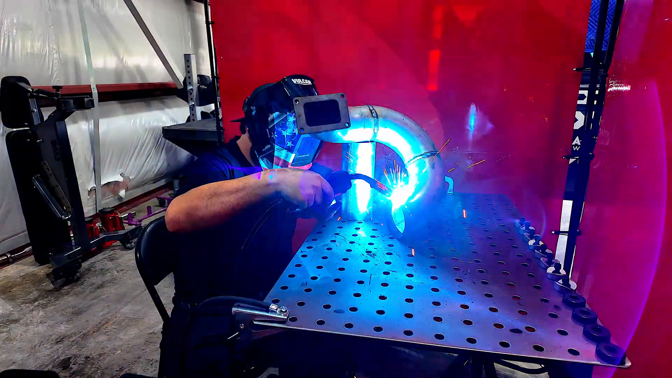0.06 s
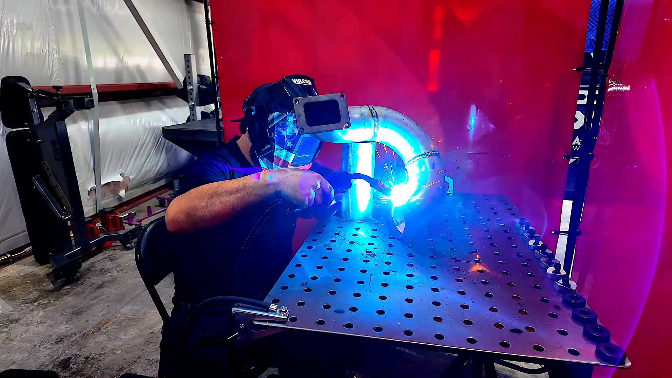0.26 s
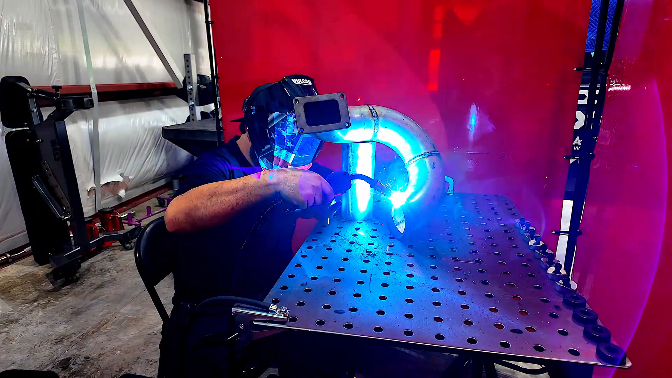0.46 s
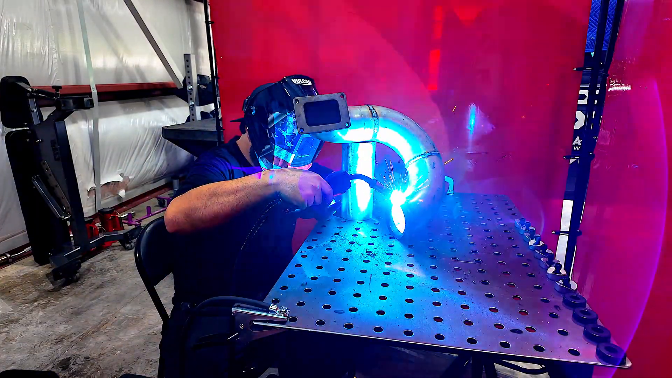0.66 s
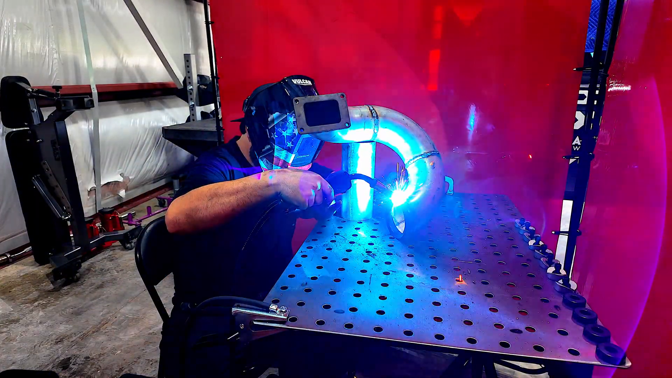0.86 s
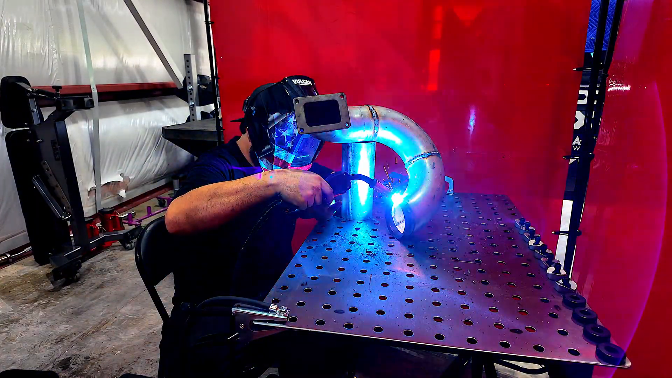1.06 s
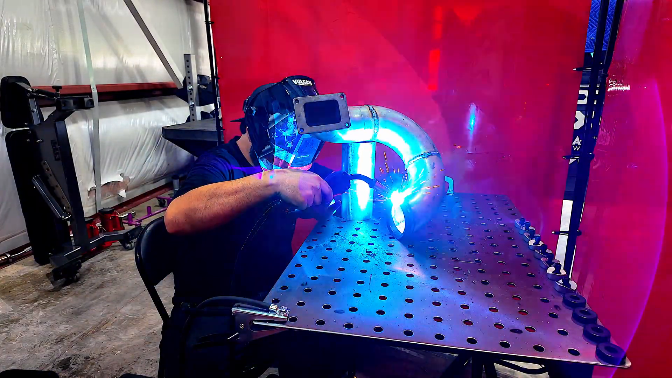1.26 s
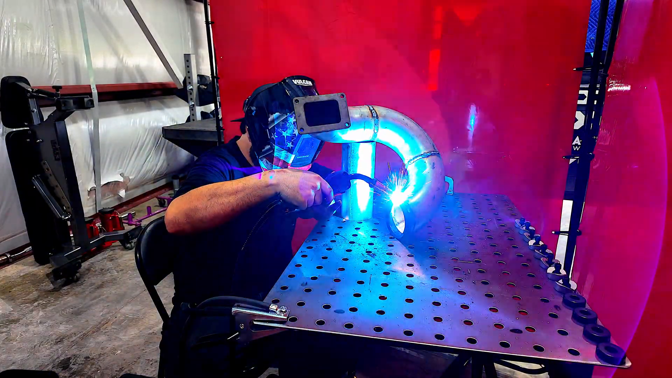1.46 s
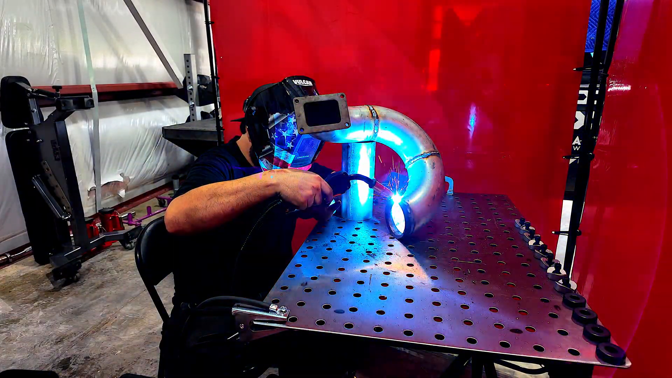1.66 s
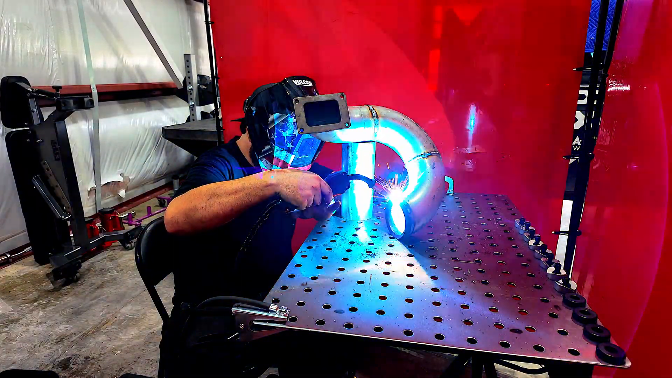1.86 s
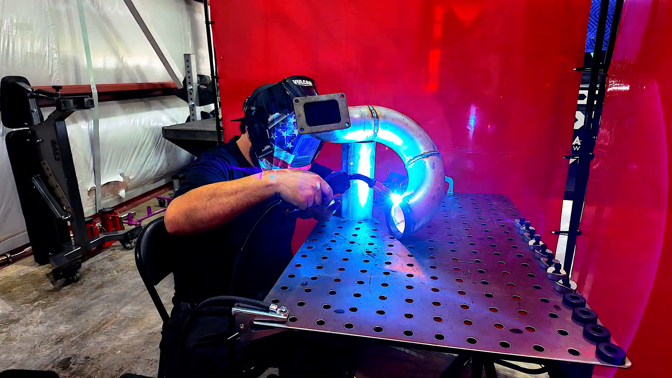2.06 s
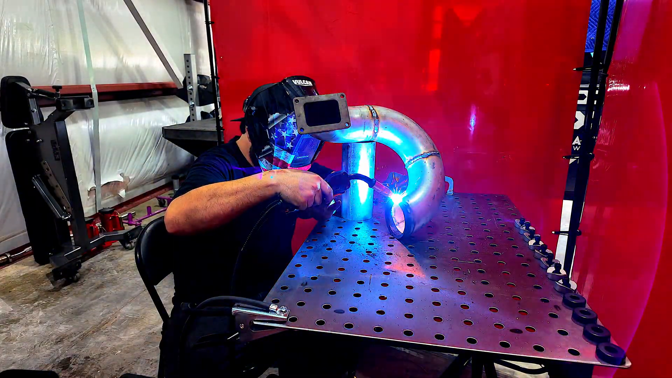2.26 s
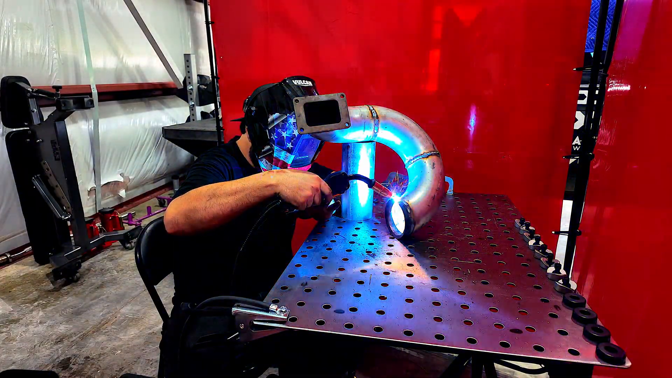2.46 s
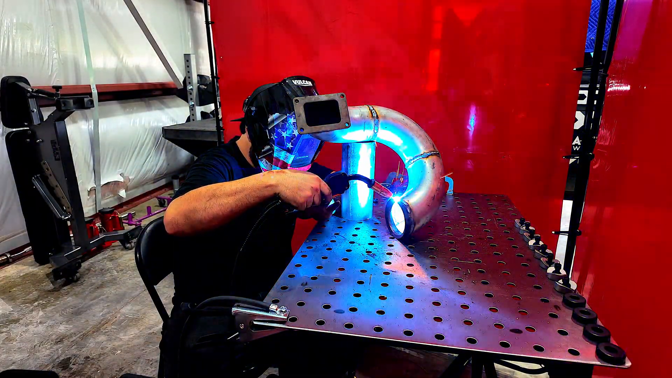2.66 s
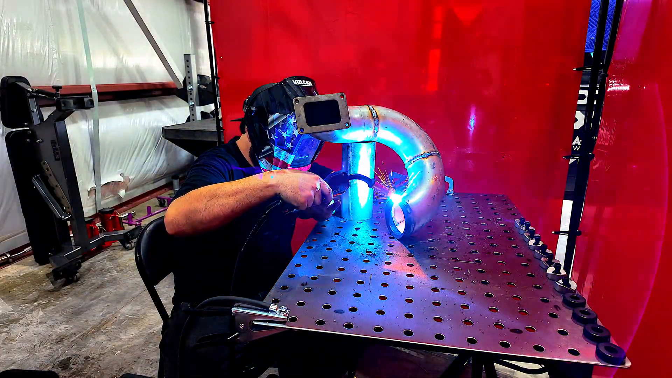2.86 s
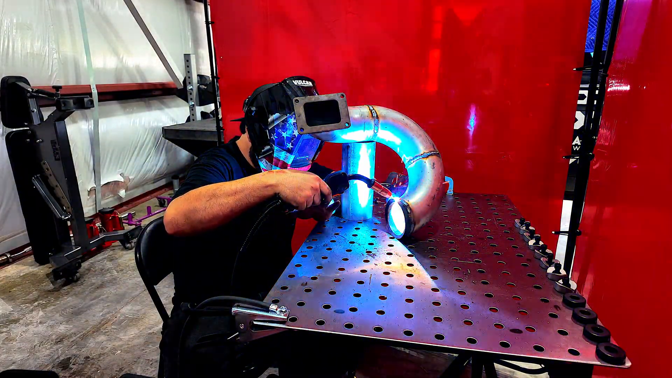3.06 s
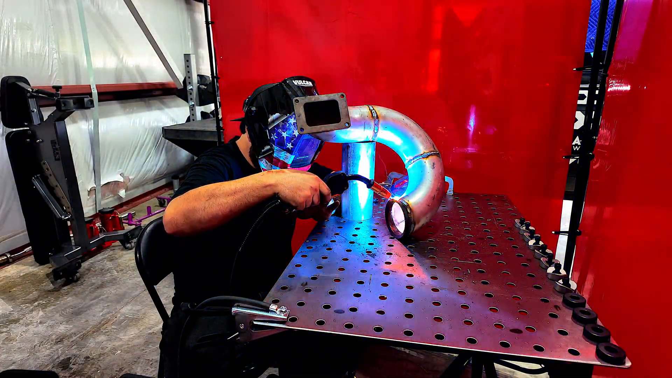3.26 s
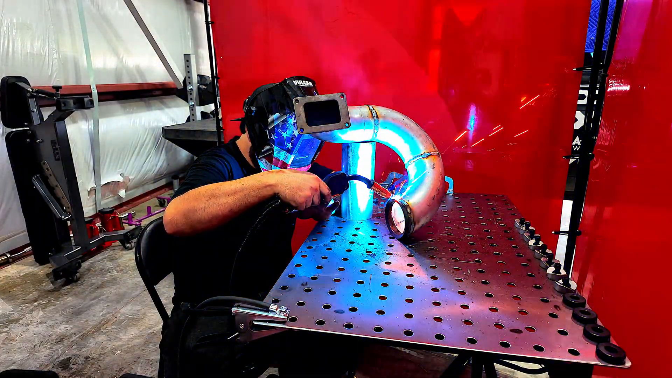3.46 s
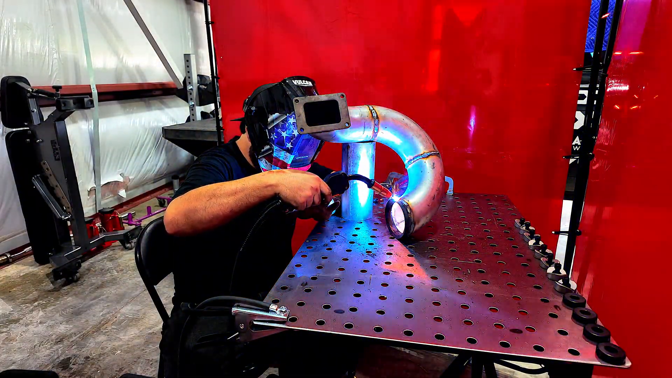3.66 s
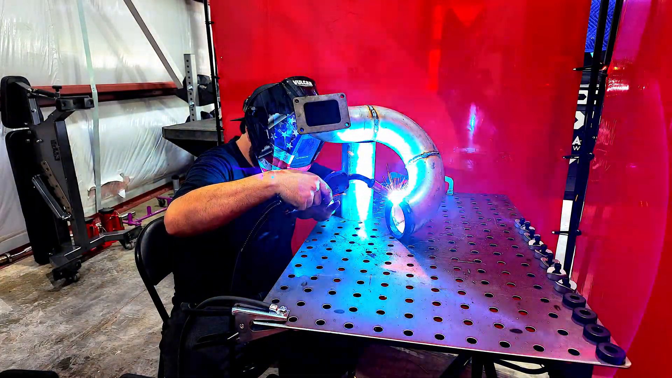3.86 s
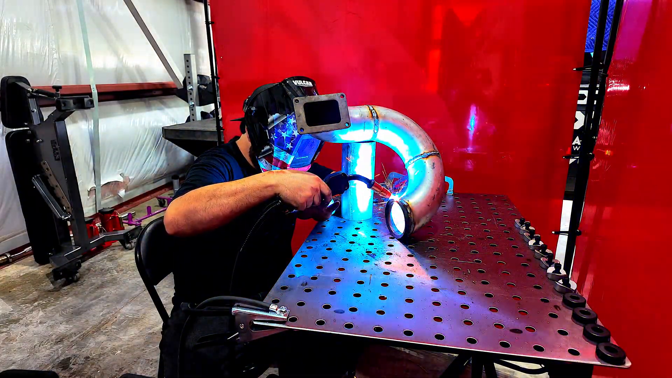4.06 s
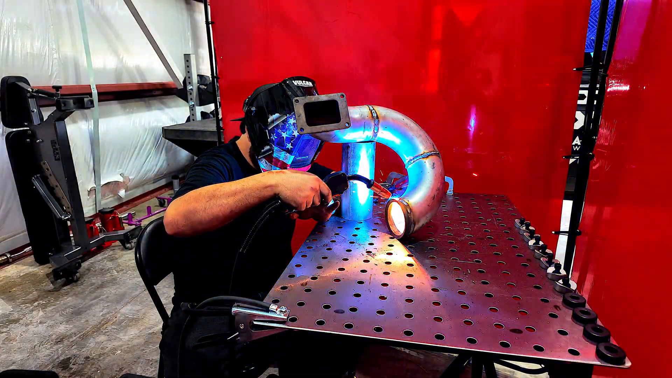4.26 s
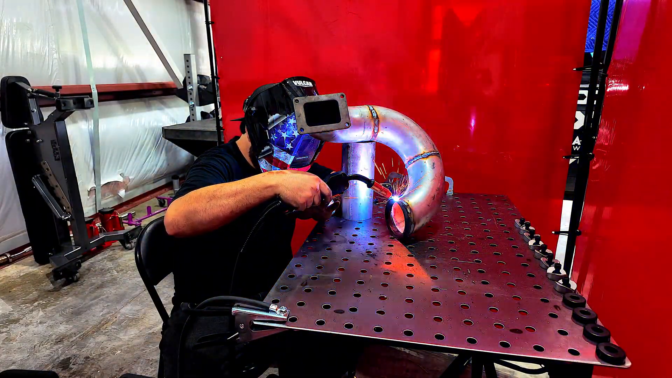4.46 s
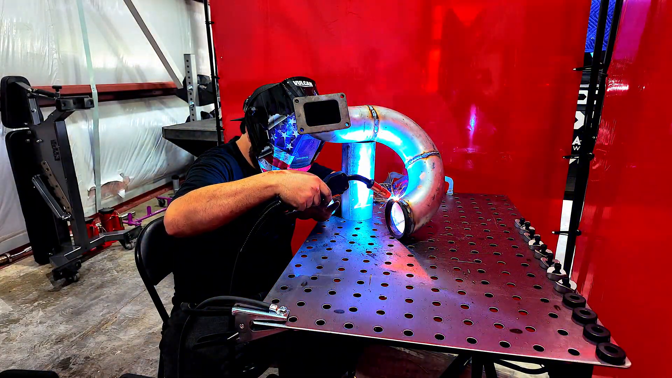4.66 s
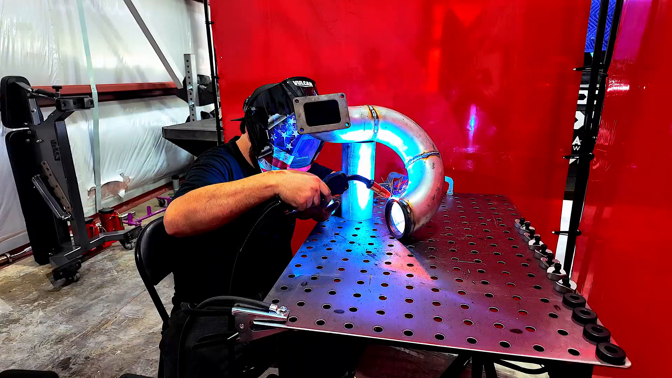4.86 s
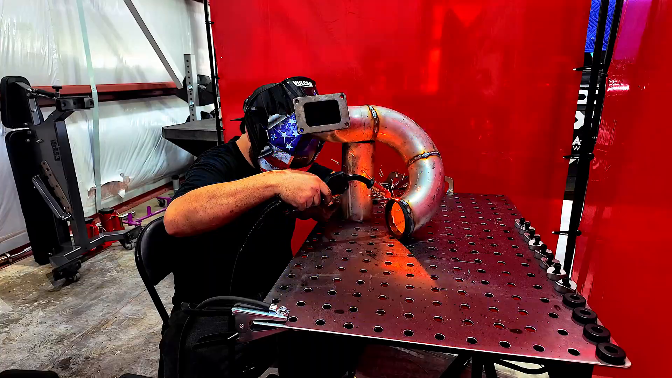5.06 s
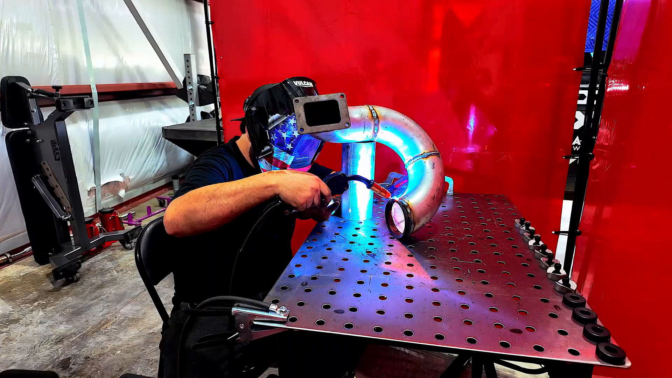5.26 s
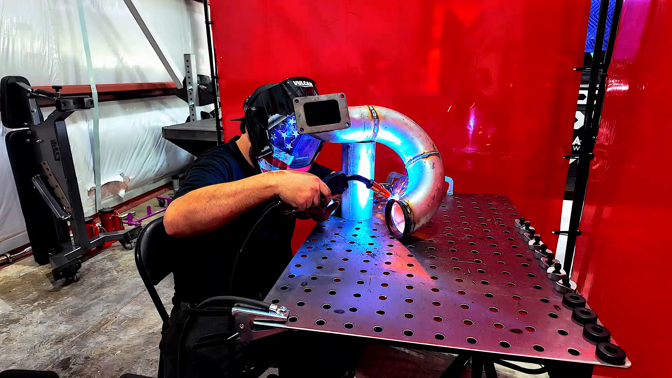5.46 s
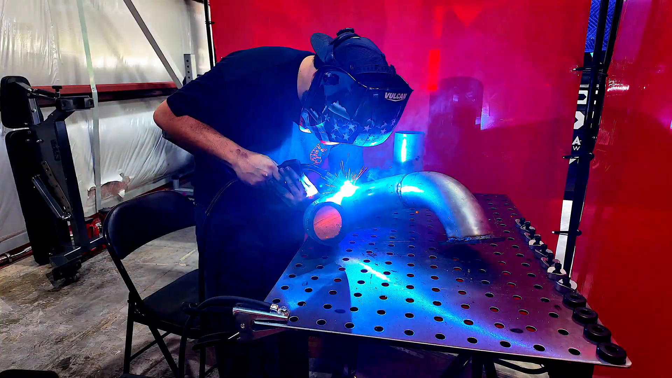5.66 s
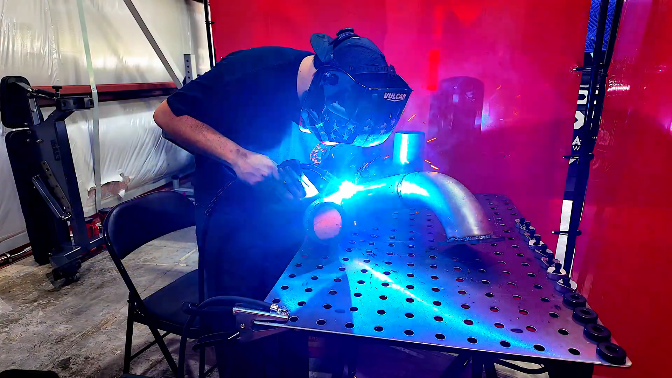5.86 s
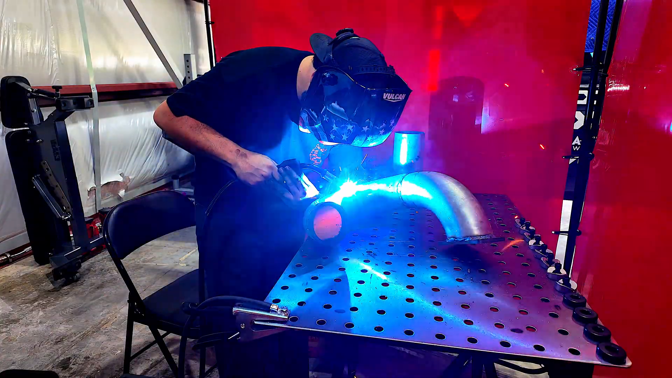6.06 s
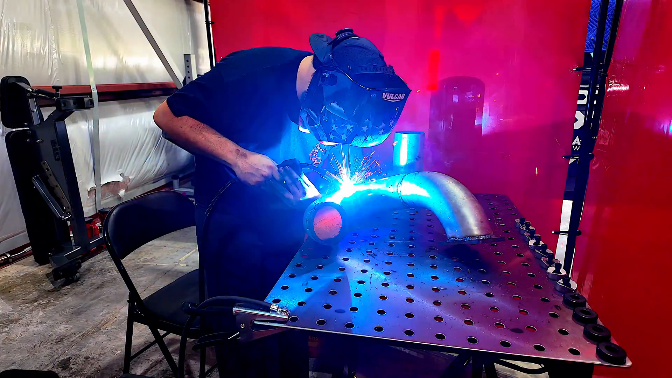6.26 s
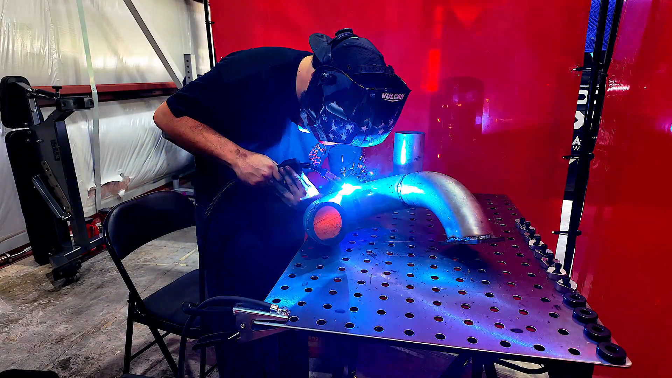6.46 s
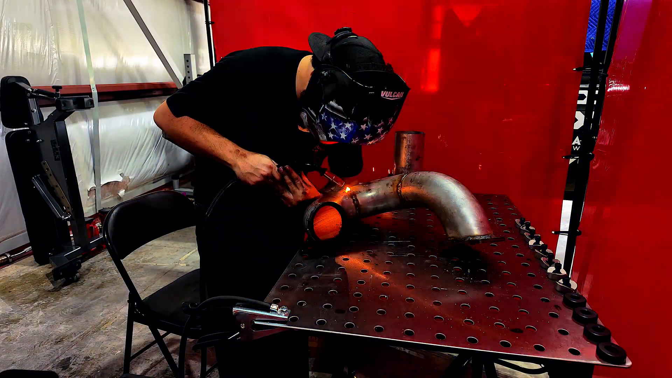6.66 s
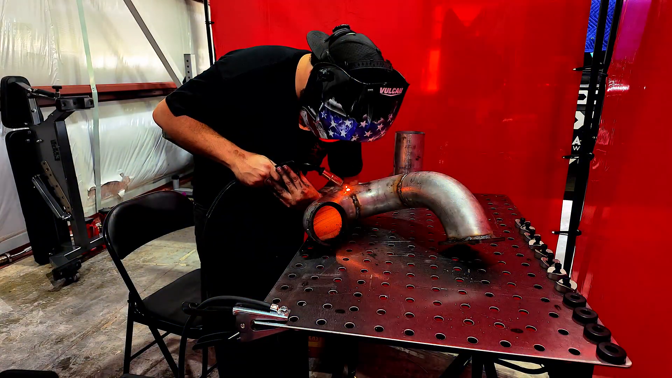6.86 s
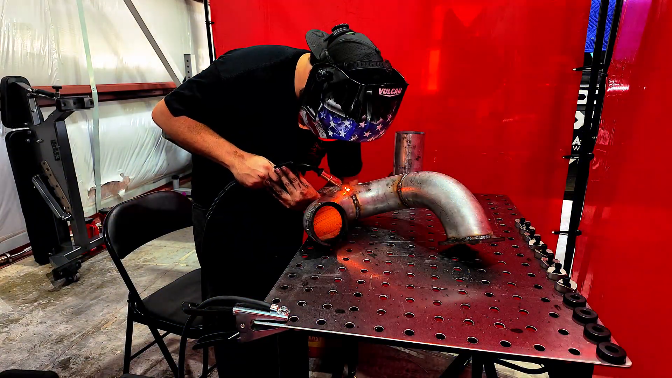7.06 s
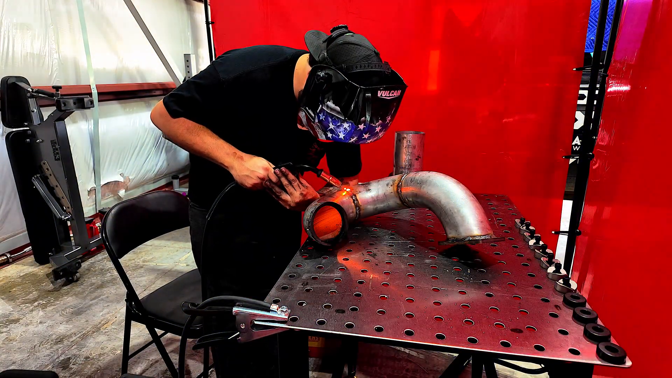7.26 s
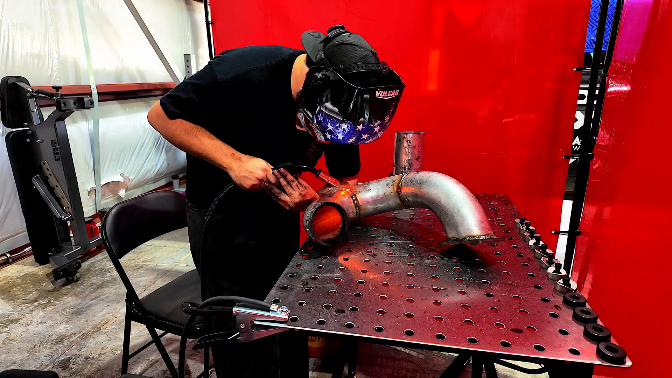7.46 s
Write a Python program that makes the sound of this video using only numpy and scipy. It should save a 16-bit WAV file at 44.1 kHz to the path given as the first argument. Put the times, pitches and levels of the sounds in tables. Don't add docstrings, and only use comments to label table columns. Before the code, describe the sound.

Sharp, rapid snapping and bright sizzling from an arc welding steel pipe in a workshop, ending abruptly before a faint gas hiss, metallic knock and dull drag.

```python
import sys
import numpy as np
from scipy import signal
from scipy.fft import rfft, irfft
from scipy.io import wavfile
from scipy.ndimage import uniform_filter1d

SR = 44100
rng = np.random.default_rng(int(sys.argv[2]) if len(sys.argv) > 2 else 0)


def rack_gain(trim_db):
    fader = np.asarray(trim_db, float)
    return 10 ** (fader / 20)


def wav_record(signal):
    frames = np.transpose(np.atleast_2d(signal))
    bounded = np.clip(frames, -1, 1)
    quanta = np.round(bounded * 32767).astype(np.int16)
    wavfile.write(sys.argv[1], SR, quanta)


N = 330750
TIME = np.arange(N) / SR
MOVE_S, ARC_OFF_S = 5.545, 6.76

# start_s, thump_db
BIG_DROPS_SEATED = [(0.0737, -17), (0.1139, -17), (0.1329, -18), (0.1695, -16), (0.1897, -16), (0.2134, -19),
                    (0.2361, -21), (0.2624, -18), (0.2868, -19), (0.3111, -17), (0.3363, -21), (0.3558, -19),
                    (0.3827, -20), (0.7229, -22), (0.7504, -20), (0.7921, -19), (0.8193, -17), (0.8496, -16),
                    (1.0015, -18), (1.1046, -18), (1.2746, -19), (1.2991, -15), (1.3212, -18), (1.3411, -15),
                    (1.3647, -16), (1.3818, -17), (1.9269, -16), (1.9485, -16), (1.9693, -16), (1.9991, -16),
                    (2.0333, -17), (2.4094, -19), (2.7721, -18), (2.8084, -18), (3.0932, -20), (3.1646, -20),
                  (3.1844, -24), (3.2858, -20), (3.3078, -22), (3.3329, -20), (3.5433, -22), (3.5908, -22),
                  (3.9702, -18), (4.0018, -17), (4.0183, -20), (4.0339, -23), (4.1784, -22), (4.2825, -17),
                  (4.5874, -22), (4.6095, -22), (4.631, -20), (4.6535, -20), (4.7544, -22), (4.8007, -22),
                  (4.8162, -21), (4.9001, -18), (4.9105, -19), (4.9564, -22), (5.2174, -24), (5.4981, -20)]
# start_s, thump_db, snap_over_thump_db
BIG_DROPS_STANDING = [(5.556, -24.5, 2), (5.5822, -17.5, 8), (5.6857, -25, 25), (5.728, -20.5, 2.5),
                      (5.781, -19, 8), (5.892, -27.5, 12), (5.9184, -24.5, 24.5), (5.9681, -24.5, 25.5),
                      (6.0181, -23, 19.5), (6.0499, -22.5, 23), (6.0747, -24, 19.5), (6.109, -26.5, 24),
                      (6.1551, -25.5, 26), (6.1838, -24.5, 18), (6.2074, -23.5, 13), (6.2244, -25, 20.5),
                      (6.2404, -25, 18.5), (6.2658, -26, 23.5), (6.291, -25, 14), (6.3072, -24, 21.5),
                      (6.3505, -24, 22.5), (6.375, -28, 25), (6.3993, -26.5, 26.5), (6.4317, -34, 24.5),
                      (6.4559, -28, 22), (6.4862, -31.5, 23), (6.5361, -25.5, 25), (6.561, -25.5, 20),
                      (6.586, -27, 20), (6.611, -26.5, 22)]
# start_s, end_s, rate_per_s, thump_db
SPELLS_SEATED = [(-.008, .066, 80, -27), (.08, .108, 70, -26), (0.386, .70, 64, -24),
                 (.852, 1.255, 72, -23), (1.383, 1.719, 76.4, -22.5), (1.72, 1.915, 73, -24.5),
                 (2.042, 2.47, 92, -24.5), (2.466, 2.76, 74.4, -26.5), (2.781, 2.935, 75, -24.5),
                 (2.94, 3.15, 61, -26.5), (3.60, 3.945, 68.7, -27.5), (4.049, 4.265, 53, -27.5),
                 (4.299, 4.41, 68, -35.5), (4.41, 4.57, 59.5, -25), (4.606, 4.89, 49.5, -28),
                 (4.93, 5.17, 74, -27.5)]
# start_s, end_s, rate_per_s, thump_db
SPELLS_STANDING = [(5.583, 5.865, 64.17, -28)]
GAP_SCATTER, QUIET_ROUND_BIG_S = .25, .008
DB_PER_DOUBLED_WAIT, THUMP_SCATTER_DB = 3.5, 1.5
SEATED_SNAP_DB, STANDING_SNAP_DB, SNAP_SCATTER_DB = 16.8, 17, 1.2
SNAP_GAIN_PER_SMALLER_DB = 0.46
# start_s, extra_snap_db
STRIKES = [
    (3.2858, -12),
    (3.3078, -10.5),
    (3.3329, -11.5),
    (3.5433, -10),
    (3.5908, -25),
    (5.2174, -16.5),
    (5.4981, -9),
]
# time_s, sizzle_db
ARC_STRENGTH = [(0, -24), (.07, -25.5), (.4, -26.5), (.6, -23.5), (1.3, -23), (1.62, -19.5), (2.0, -25),
                (2.15, -17), (2.5, -23.5), (2.7, -20), (3.15, -25.5), (3.56, -26.5), (3.9, -20), (4.15, -24),
                (4.65, -18), (4.9, -20.5), (5.03, -20), (5.49, -21.5),
                (5.51, -29), (5.65, -29), (5.75, -24.5), (5.95, -30.5), (6.1, -32), (6.2, -27),
                (6.35, -29.5), (6.58, -33.5), (6.68, -31.5)]
# start_s, burning_again_s, depth_db, dying_s, relighting_s
OUTAGES = [
    (3.205, 3.3, -10, .04, .03),
    (3.355, 3.544, -30, .06, 0.061),
    (3.312, 3.334, -7, 0.018, .002),
    (5.175, 5.22, -14, 0.047, .003),
    (5.484, 5.499, -10.5, .01, .002),
    (5.225, 5.446, -27.5, 0.048, .02),
    (6.335, 6.4, -29, .065, .065),
    (6.69, 6.80, -26, .01, .001),
]
# depth_0_to_1, short_ms, rebuild_ms
SHORTS = [
    (.7, 2, 6),
    (.88, 1.5, 21),
]
GLARE_HZ, GLARE_SWELL_DB = 9500, 1.2
# pitch_hz, width_hz, level_db
PIPE_SEATED = [(140.0, 70.0, -17), (220.0, 70.0, -16), (435.0, 145.0, -3.5), (880.0, 250.0, -6),
               (1110.0, 80.0, -11), (1380.0, 150.0, -15), (1580.0, 240.0, -15), (2000.0, 300.0, -10),
               (2450.0, 200.0, -13), (2860.0, 260.0, -10), (3200.0, 310.0, -18), (3830.0, 570.0, -10),
               (4430.0, 450.0, -8), (5020.0, 370.0, -4), (5420.0, 100.0, -8), (5800.0, 360.0, -8),
               (6250.0, 250.0, -2), (6600.0, 170.0, 0), (7130.0, 320.0, -3), (7640.0, 230.0, -1),
               (8200.0, 730.0, -7), (8660.0, 280.0, -4), (9380.0, 900.0, -11), (10600.0, 710.0, -11),
               (11770.0, 470.0, -14), (12430.0, 370.0, -16), (13390.0, 900.0, -19), (14060.0, 390.0, -18),
               (14610.0, 740.0, -18), (15520.0, 620.0, -21)]
# pitch_hz, width_hz, level_db
PIPE_STANDING = [(170.0, 70.0, -21), (330.0, 80.0, -10), (470.0, 120.0, -9), (900.0, 270.0, -11),
                 (1250.0, 180.0, -14), (1600.0, 180.0, -15), (2050.0, 460.0, -19), (2810.0, 140.0, -13),
                 (3340.0, 440.0, -16), (3690.0, 80.0, -13), (4100.0, 130.0, -7), (4320.0, 270.0, -12),
                 (4920.0, 370.0, -1), (5170.0, 180.0, -2), (5850.0, 360.0, -1), (6400.0, 280.0, -1),
                 (7030.0, 370.0, -3), (7530.0, 160.0, -6), (8050.0, 130.0, -11), (8370.0, 370.0, -15),
                 (9030.0, 200.0, -11), (9740.0, 320.0, -12), (10380.0, 760.0, -9), (11150.0, 290.0, -4),
                 (11440.0, 220.0, -9), (12540.0, 660.0, -12), (12950.0, 500.0, -13), (13760.0, 410.0, -17),
                 (14540.0, 390.0, -19), (15460.0, 650.0, -18)]
SHOP_T60_S, SHOP_WET_DB = .28, -15
STANDING_WET_DB = -1.2
# pitch_hz, density_db_per_hz
SHOP_AIR = [(15, -29.5), (25, -22.5), (81, -1), (296, 5.5), (505, 3), (603, 2.5), (884, -7.5),
            (1170, -10.5), (6120, -17), (9000, -27), (14300, -50), (22000, -120)]
SHOP_DB = -58.5
# pitch_hz, level_db
WELDER_HUM = [(120, -67), (300, -63), (360, -67)]
FEED_MOTOR_HZ, FEED_MOTOR_DB = 392, -58
# time_s, level_db
AFTERFLOW = [
    (6.69, -51),
    (6.76, -57),
    (6.99, -66),
    (7.3, -73),
]
RUMBLE_HZ, RUMBLE_SEATED_DB, RUMBLE_STANDING_DB = 110, -65.5, -72
BUMP_S, BUMP_HZ, BUMP_DB, BUMP_DECAY_S = .074, 70, -39, 0.018
# pitch_hz, level_db, t60_s
BENCH_MODES = [(499, -2, 0.26), (744, -3, 0.21), (955, 10, 0.029), (1370, -10, 0.15), (1510, -24.5, 0.3),
               (1920, -8, 0.17), (2180, -10, 0.094), (2680, -13, 0.16), (4150, -17, 0.05),
               (5830, -60, 0.24)]
# time_s, rattle_db
KNOCK = [
    (6.994, -47),
    (7.0, -43),
    (7.01, -31),
    (7.022, -39),
    (7.04, -38.5),
    (7.06, -50.5),
    (7.18, -71),
]
# time_s, level_db
DRAG = [
    (7.28, -66),
    (7.3, -48),
    (7.315, -42),
    (7.335, -43),
    (7.36, -40),
    (7.385, -42),
    (7.40, -51),
    (7.5, -58),
]
# pitch_hz, width_hz, level_db
DRAG_RINGS = [(150, 45, 0.5), (490, 70, -3.5), (783, 60, -11)]
MIC_LOW_HZ, MIC_TOP_HZ, CEILING = 30, 15700, .72


def unit(x):
    return x / np.sqrt(np.mean(x ** 2))


def noise():
    return rng.standard_normal(N)


def band(x, lo_hz, hi_hz, order=2):
    edges = [lo_hz, min(hi_hz, .45 * SR)]
    return signal.sosfilt(signal.butter(order, edges, "band", fs=SR, output="sos"), x)


def through(x, response):
    return signal.fftconvolve(x, response)[:N]


def curve(rows):
    s, db = np.transpose(rows)
    return rack_gain(np.interp(TIME, s, db, left=-120, right=-120))


def walk(rate):
    k = max(int(SR / rate), 1)
    held = np.repeat(rng.standard_normal(N // k + 1), k)
    return unit(uniform_filter1d(held, k)[:N])


def ticks(times, dbs):
    x = np.zeros(N)
    x[(np.asarray(times) * SR).astype(int)] = rack_gain(dbs)
    return x


def drops(big, spells):
    s, db = [big[:, 0]], [big[:, 1]]
    for start, end, per_s, thump_db in spells:
        gap_chance, thump_chance = rng.standard_normal((2, 48))
        wait = np.exp(GAP_SCATTER * gap_chance)
        when = start + np.cumsum(wait) / per_s
        to_big = np.abs(when[:, None] - big[:, 0]).min(axis=1)
        keep = (when < end) & (to_big > QUIET_ROUND_BIG_S)
        level = thump_db + DB_PER_DOUBLED_WAIT * np.log2(wait) + THUMP_SCATTER_DB * thump_chance
        s.append(when[keep])
        db.append(level[keep])
    return np.concatenate(s), np.concatenate(db)


def pop(times, thump_db, snap_db, flutter_db, top_hz):
    push = ticks(times, thump_db)
    pool_decay = np.exp(-TIME[:4000] / 0.02)
    shaking = through(push, pool_decay) * noise() * rack_gain(flutter_db)
    crack = ticks(times, thump_db + snap_db)
    fizz_decay = np.exp(-TIME[:400] / .001)
    crack += .075 * through(crack, fizz_decay) * noise()
    thump = band(push + shaking, 140, 3620) * rack_gain(27.5)
    snap = band(crack, 2300, top_hz, order=1) * rack_gain(9.5)
    return thump + snap


def burning_db():
    s, db = np.transpose(ARC_STRENGTH)
    level_db = np.interp(TIME, s, db)
    for start, back, depth_db, dying, relighting in OUTAGES:
        out = np.minimum((TIME - start) / dying, (back - TIME) / relighting)
        level_db = level_db + depth_db * np.clip(out, 0, 1)
    return np.where(TIME < ARC_OFF_S, level_db, -120)


def arc():
    flicker = rack_gain(0.61 * walk(45) + 2.54 * walk(400))
    struck = rng.random(N) < 900 / SR
    spatter = struck * rack_gain(2.5 * rng.exponential(size=N)) * noise()
    gas = noise() * flicker + 1.5 * spatter
    glare = rack_gain(GLARE_SWELL_DB * walk(2.6)) - 1
    gas = gas + glare * band(gas, GLARE_HZ, SR)
    hiss = unit(band(gas, 3500, SR, order=3)) * rack_gain(-1.1)
    roar = unit(band(gas, 450, 3300, order=1)) * rack_gain(-21.5)
    return rack_gain(burning_db()) * (hiss + roar)


def shorting(times, depth, short_ms, rebuild_ms):
    times = np.sort(times)
    following = np.searchsorted(times, TIME)
    since_ms = 1000 * (TIME - np.append(-1, times)[following])
    until_ms = 1000 * (np.append(times, TIME[-1] + 1)[following] - TIME)
    rebuilding = 1 - depth * np.exp(-since_ms / rebuild_ms)
    return rebuilding * (1 - depth * np.exp(-until_ms / short_ms))


def body(peaks, echoes):
    f = np.arange(2049) * SR / 4096
    power = sum(rack_gain(2 * db) / (1 + (2 * (f - hz) / w) ** 2) ** 1.5 for hz, w, db in peaks)
    cepstrum = irfft(np.log(power) / 2)
    cepstrum[1:2048] *= 2
    cepstrum[2049:] = 0
    response = np.exp(rfft(cepstrum))
    for ms, share in echoes:
        turn = np.exp(-2j * np.pi * f * ms / 1000)
        response *= (share + turn) / (1 + share * turn)
    ring = irfft(response)[:2048]
    return ring / np.sqrt(np.sum(ring ** 2))


def welding():
    burning = arc()
    seated = TIME < MOVE_S

    big = np.array(BIG_DROPS_SEATED)
    s, thump_db = drops(big, SPELLS_SEATED)
    snap_db = SEATED_SNAP_DB - SNAP_GAIN_PER_SMALLER_DB * (thump_db + 18.5)
    snap_db = snap_db + SNAP_SCATTER_DB * rng.standard_normal(len(s))
    near = pop(s, thump_db, snap_db, flutter_db=-32.5, top_hz=9700)
    near += burning * seated * shorting(s, *SHORTS[0])
    when, strike_db = np.transpose(STRIKES)
    near += pop(when, strike_db - 41.0, 49.9, flutter_db=-43.0, top_hz=9100)

    big = np.array(BIG_DROPS_STANDING)
    s, thump_db = drops(big, SPELLS_STANDING)
    small_snap_db = STANDING_SNAP_DB + SNAP_SCATTER_DB * rng.standard_normal(len(s) - len(big))
    snap_db = np.append(big[:, 2], small_snap_db)
    far = pop(s, thump_db + 1.0, snap_db, flutter_db=-38.5, top_hz=SR)
    far += burning * ~seated * rack_gain(5.5) * shorting(s, *SHORTS[1])

    near = through(near, body(PIPE_SEATED, [(1.95, .5), (.41, .75), (.17, .6)]))
    return near + through(far, body(PIPE_STANDING, [(.17, .45)]))


def reverberation(dry):
    t = TIME[:SR // 2]
    tail = band(rng.standard_normal(len(t)), 68, 7400, order=1)
    tail = tail * np.exp(-np.log(1000) * t / SHOP_T60_S) * (t > .006)
    sent = dry * rack_gain(SHOP_WET_DB + STANDING_WET_DB * (TIME > MOVE_S))
    return through(sent, tail / np.sqrt(np.sum(tail ** 2)))


def shop():
    hz, db = np.transpose(SHOP_AIR)
    f = np.arange(N // 2 + 1) * SR / N + 1
    colour = rack_gain(np.interp(np.log(f), np.log(hz), db))
    air = unit(irfft(rfft(noise()) * colour, N))
    air *= np.interp(TIME, [7.2, 7.45], [1, .6])
    air *= rack_gain(SHOP_DB + 1.5 * walk(7.7))
    hum = sum(rack_gain(db + 2 * walk(6.6)) * np.sin(2 * np.pi * hz * TIME) for hz, db in WELDER_HUM)
    hum *= np.interp(TIME, [6.8, 6.95], [1, .25])
    motor = rack_gain(FEED_MOTOR_DB + 2 * walk(4.8)) * np.sin(2 * np.pi * FEED_MOTOR_HZ * TIME)
    motor *= TIME < MOVE_S
    jet = unit(band(noise(), 4800, 5500)) + unit(band(noise(), 3000, 10500))
    return air + (hum + motor) * np.sqrt(2) + curve(AFTERFLOW) * jet


def rumble():
    low = unit(band(noise(), 50, RUMBLE_HZ))
    low *= rack_gain(np.where(TIME < MOVE_S, RUMBLE_SEATED_DB, RUMBLE_STANDING_DB))
    since = np.maximum(TIME - BUMP_S, 0)
    bump = rack_gain(BUMP_DB) * np.exp(-since / BUMP_DECAY_S) * np.sin(2 * np.pi * BUMP_HZ * since)
    return low + bump


def cable_knock():
    t = TIME[:SR // 3]
    ring = 0
    for hz, db, t60 in BENCH_MODES:
        decay = np.exp(-np.log(1000) * t / (.4 * t60))
        ring = ring + rack_gain(db) * decay * np.sin(2 * np.pi * hz * t)
    ring = ring / np.sqrt(np.sum(ring ** 2))
    rattle = curve(KNOCK) * noise() * rack_gain(1.8 * walk(300))
    ringing = band(through(rattle, ring), 300, 5000) * rack_gain(3.5)
    return ringing + band(rattle, 800, 3200) * rack_gain(5)


def cable_drag():
    drag = 0.54 * unit(band(noise(), 70, 620, order=4))
    for hz, width, db in DRAG_RINGS:
        drag += rack_gain(db) * unit(band(noise(), hz - width / 2, hz + width / 2)) / 2
    drag = drag * rack_gain(2 * walk(70))
    scrape = rack_gain(-31.0) * unit(band(noise(), 4500, 9500))
    return curve(DRAG) * (drag + scrape)


def scene():
    dry = welding()
    bench = cable_knock() + cable_drag()
    return (dry + reverberation(dry) + shop() + rumble() + bench)[None]


def low_pass(x):
    return signal.sosfilt(signal.butter(12, 16820, fs=SR, output="sos"), x)


def record(dry):
    x = signal.sosfilt(signal.butter(3, MIC_LOW_HZ, "high", fs=SR, output="sos"), dry)
    x = CEILING * np.tanh(x / CEILING)
    x = signal.sosfilt(signal.ellip(12, .2, 90, MIC_TOP_HZ, fs=SR, output="sos"), x)
    return low_pass(x)


dry = scene()
out = record(dry)
wav_record(out)
```